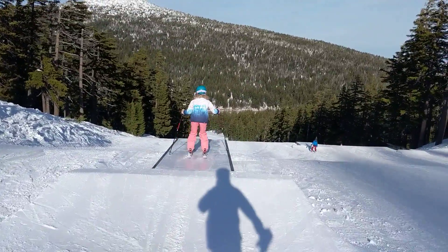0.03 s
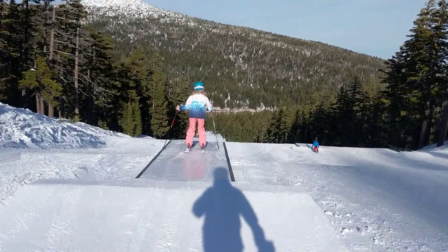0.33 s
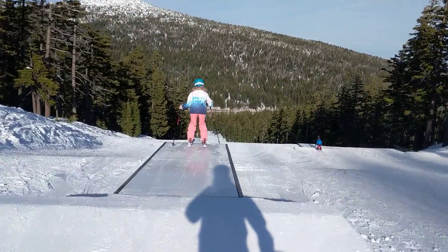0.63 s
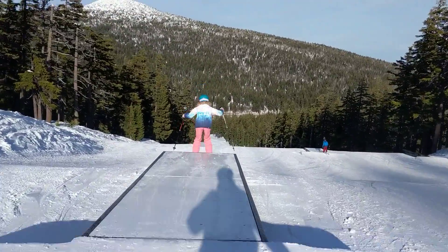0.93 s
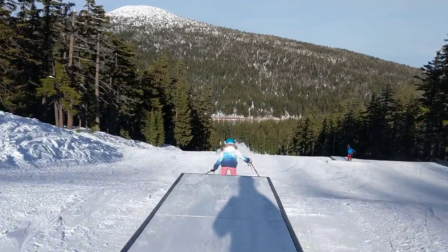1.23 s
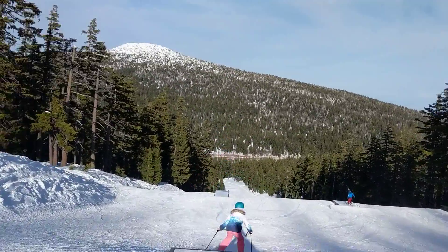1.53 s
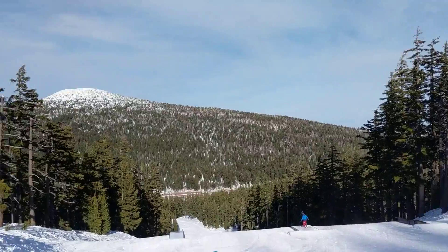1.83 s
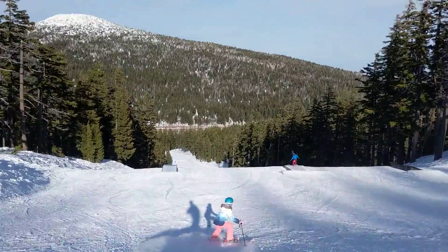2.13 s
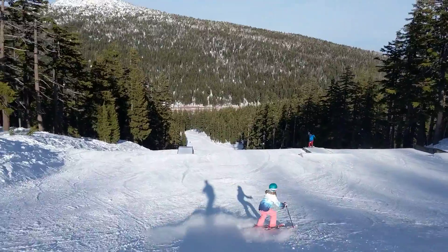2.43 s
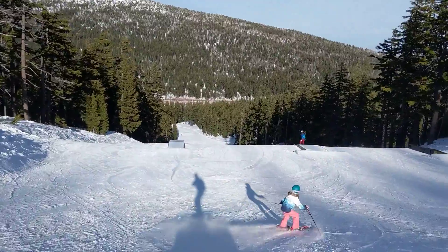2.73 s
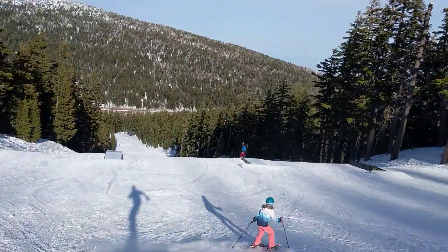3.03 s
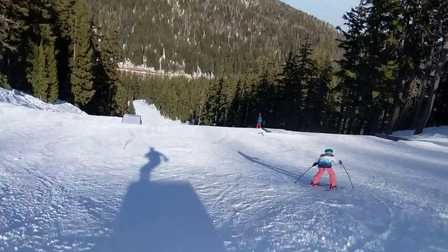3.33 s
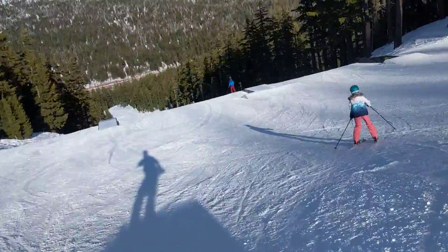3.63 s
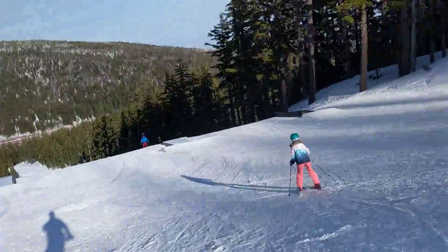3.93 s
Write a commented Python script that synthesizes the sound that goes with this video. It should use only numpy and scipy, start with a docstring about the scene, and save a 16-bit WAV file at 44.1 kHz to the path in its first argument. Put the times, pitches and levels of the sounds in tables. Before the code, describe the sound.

Skis clack onto a plastic box in a snow park, rub along it and slap down on packed snow. Their edges scrape through a braking turn and thud over bumps, while wind rumbles on the skier's own microphone.

```python
"""In a snow park, skis clack onto a plastic box, rub along it and slap down on packed snow.
Their edges scrape the crust in a braking turn, thud over hard bumps and skip through a last turn.
Rubbing makes the skis drone and ring, and jolts set them flapping.
Wind and ski vibration rumble in the skier's own mono camera."""
import sys
import numpy as np
from scipy import signal
from scipy.fft import rfft, irfft, next_fast_len
from scipy.io import wavfile
from scipy.ndimage import uniform_filter1d, map_coordinates

SR = 44100
rng = np.random.default_rng(int(sys.argv[2]) if len(sys.argv) > 2 else 0)


def materialize(psi):
    """Save the field psi as 16-bit PCM at rate SR to the path in sys.argv[1].

    A 1-D psi becomes a single channel; in a 2-D psi each row is a channel.
    """
    bounded = np.clip(np.atleast_2d(psi).T, -1, 1)
    quanta = np.round(bounded * 32767).astype(np.int16)
    wavfile.write(sys.argv[1], SR, quanta)


N = 4 * SR


def amp(db):
    """Turn decibels into a gain to multiply by."""
    return 10 ** (np.asarray(db) / 20)


def unit(x):
    """Scale a sound to an average power of 1."""
    return x / np.sqrt(np.mean(x ** 2) + 1e-20)


def level(rows):
    """A gain for each sample from (time [s], level [dB]) rows, fading fast outside them."""
    times, db = np.transpose(rows)
    t = np.arange(N) / SR
    outside_s = np.maximum(times[0] - t, 0) + np.maximum(t - times[-1], 0)
    return amp(np.interp(t, times, db) - 490 * outside_s)


def wobble(per_s):
    """A smooth curve through per_s random values a second."""
    values = rng.standard_normal(int(N * per_s / SR) + 4)
    return map_coordinates(values, [np.arange(N) * per_s / SR])


def coloured(x, colour):
    """Shape a sound's bass and treble with (frequency [Hz], level [dB]) rows."""
    size = 2 * next_fast_len(len(x))
    hz, db = np.transpose(colour)
    gain = amp(np.interp(np.log(np.fft.rfftfreq(size, 1 / SR) + 1), np.log(hz + 1), db))
    cepstrum = irfft(np.log(np.maximum(gain, 1e-6)))
    cepstrum[1:size // 2] *= 2  # fold it so the filter rings after a hit, never before
    cepstrum[size // 2 + 1:] = 0
    return irfft(rfft(x, size) * np.exp(rfft(cepstrum)))[:len(x)]


def resonate(x, hz, width_hz):
    """Keep the sound near one pitch: a narrow filter, then one twice as wide."""
    for width in (width_hz, 2 * width_hz):
        x = signal.lfilter(*signal.iirpeak(hz, hz / width, SR), x)
    return x


def rush(patchy_db):
    """Hiss with louder and softer patches scattered over time and pitch."""
    spectrum = signal.stft(rng.standard_normal(N), nperseg=512)[2]
    patches = uniform_filter1d(rng.standard_normal(spectrum.shape), size=7, axis=0)
    patches = unit(uniform_filter1d(patches, size=8, axis=1))
    return unit(signal.istft(spectrum * amp(patchy_db * patches), nperseg=512)[1][:N])


def grains(per_s, spread_db):
    """Tiny snaps of uneven size at random moments."""
    snaps = (rng.random(N) < per_s / SR) * rng.choice([-1, 1], N)
    sizes = amp(spread_db * np.minimum(rng.exponential(size=N), 4))
    return unit(snaps * sizes)


def blow(colour, crunch_db, crunch_t60, tail_db, tail_t60, treble_db=0):
    """One hit: a sharp push, a short crunch and a faint tail. A t60 is the seconds to fade by 60 dB."""
    t = np.arange(SR // 5) / SR
    fade = amp(crunch_db - 60 * t / crunch_t60) + amp(tail_db - 60 * t / tail_t60)
    hit = coloured(rng.standard_normal(len(t)) * fade, [(150, -5), (1500, 1.5)])
    hit[0] += 1  # the push
    hit = coloured(hit, colour)
    # make this hit brighter or duller by its own treble setting
    return coloured(hit / np.linalg.norm(hit), [(510, 0), (2500, treble_db)])


def add(track, start_s, x):
    """Mix a short sound into the track."""
    i = max(round(start_s * SR), 0)
    track[i:i + len(x)] += x[:max(N - i, 0)]


def rumble():
    """Wind and shaking make a low rumble at the microphone."""
    # strength of the rumble (time [s], level [dB])
    loudness = [(0, -56), (.09, -48), (.13, -44), (.21, -32), (.27, -44), (.4, -41), (.46, -48),
                (.8, -46.5), (1.05, -40.5), (1.22, -46.5), (1.35, -43), (1.6, -43), (1.88, -46.5),
                (2.05, -47), (2.14, -32.5), (2.3, -43.5), (2.42, -36.5), (2.6, -34.5), (2.72, -39.5),
                (2.82, -36), (2.9, -44), (3.02, -37.5), (3.28, -42.5), (3.36, -33.5), (3.45, -42),
                (3.53, -35), (3.65, -33), (3.8, -43), (3.94, -44), (4, -38)]
    # its deep tone (frequency [Hz], level [dB])
    colour = [(20, -41), (35, -20.5), (52, 2.5), (66, -3), (100, -6), (170, -10), (260, -20.5),
              (450, -38.5), (1500, -68.5)]
    noise = unit(coloured(rng.standard_normal(N), colour))
    swell = np.sqrt(np.abs(uniform_filter1d(noise ** 2, size=1800)) + 0.022)
    return level(loudness) * unit(noise / swell)  # dividing evens out chance swells


def flexing(rise_s=0.0028, t60=0.13):
    """A jolt sets the skis flapping for a few slow swings."""
    # jolts that bend the skis (time [s], level [dB], frequency [Hz])
    jolts = [(0.189, -27, 99), (1.333, -29.5, 71), (1.909, -33.5, 74), (1.954, -32, 72), (2.134, -23, 65),
             (2.209, -23, 62), (2.31, -26, 59), (2.427, -25, 54.6), (2.464, -20, 66), (2.814, -27, 67.4),
             (3.547, -26, 78)]
    out, t = np.zeros(N), np.arange(SR // 3) / SR
    shape = (1 - np.exp(-t / rise_s)) ** 2 * amp(-60 * t / t60)
    for start, db, hz in jolts:
        add(out, start, -amp(db) * shape / shape.max() * np.sin(2 * np.pi * hz * t))
    return out


def snow_hiss():
    """Snow hisses under the running skis."""
    # strength of the hiss (time [s], level [dB])
    loudness = [(0, -54), (.3, -52.5), (.8, -50.5), (1.3, -51.5), (1.55, -50.5), (1.8, -52), (1.9, -56),
                (2.04, -55.5), (2.2, -58), (3.3, -52), (3.57, -53), (3.72, -49.5), (3.8, -54), (4, -40)]
    # tone of the snow (frequency [Hz], level [dB])
    colour = [(100, 6.5), (700, 1.5), (1500, 3.5), (3000, 0.5), (5000, 0.5), (7000, 0), (8400, 6.5),
              (9400, -5.5), (11000, -15.5), (15500, -26)]
    snow = rush(patchy_db=3) + amp(-7.5) * grains(per_s=250, spread_db=-0.5)
    return unit(coloured(snow, colour)) * level(loudness) * amp(0.64 * wobble(25.26))


def box_slide():
    """The skis rub along the plastic box, which sings faintly under them."""
    # strength of the rubbing (time [s], level [dB])
    loudness = [(0, -64), (.27, -52.5), (.45, -48.5), (.9, -48), (1.1, -50), (1.2, -56.5), (1.27, -46),
                (1.34, -58.5), (1.55, -76), (1.8, -64), (2, -55.5)]
    # tone of skis on plastic (frequency [Hz], level [dB])
    colour = [(80, -9), (300, 6), (800, 4), (1200, 0), (1800, -0.5), (2500, -0.5), (3200, -4), (4500, -7),
              (8000, -11.5), (11000, -34)]
    rub = unit(coloured(rush(patchy_db=2) + amp(-6) * grains(per_s=600, spread_db=5), colour))
    ring = unit(resonate(rush(patchy_db=2), hz=2830, width_hz=140))
    return (rub + amp(-12) * ring) * level(loudness) * amp(wobble(35.35))


def ski_drone():
    """The skis give a lumpy drone as they run under the skier's weight."""
    # strength of the drone (time [s], level [dB])
    loudness = [(0, -48), (.09, -45), (.14, -39), (.28, -53.5), (.44, -44.5), (.7, -49.5), (.82, -44),
                (.9, -43), (1.04, -52.5), (1.14, -49), (1.27, -45.5), (1.39, -46.5), (1.55, -40.5),
                (1.7, -48), (1.82, -52.5), (1.96, -52.5), (2.04, -55), (2.075, -33.5), (2.15, -44),
                (2.19, -49), (3.2, -46.5), (3.3, -49), (3.45, -50.5), (3.58, -63), (3.63, -45), (3.72, -44),
                (3.79, -46.5), (4, -58)]
    # its hollow tone (frequency [Hz], level [dB])
    colour = [(40, -11.5), (130, -0.5), (280, 5), (430, -3.5), (600, -3.5), (880, -9.5), (1150, -20),
              (2000, -27.5), (5000, -47)]
    lumps = rush(patchy_db=1.5) + amp(-2.5) * grains(per_s=90, spread_db=4)
    return unit(coloured(lumps, colour)) * level(loudness) * amp(1.75 * wobble(29.36))


def ski_ring():
    """Rubbing keeps the skis ringing at their own pitch."""
    # strength of the ringing (time [s], level [dB])
    loudness = [(1.32, -68), (1.39, -46.5), (1.6, -58), (1.71, -49.5), (1.8, -71), (2.05, -66), (2.08, -56),
                (2.14, -44), (2.18, -51), (2.25, -51.5), (2.35, -57), (2.38, -47), (2.54, -43.5),
                (2.8, -41), (2.87, -40.5), (2.95, -41), (3.09, -39), (3.14, -55), (3.25, -59)]
    ring = resonate(rush(patchy_db=2.9), hz=857, width_hz=163)
    return unit(ring) * level(loudness) * amp(0.4 * wobble(40))


def scuffs():
    """Short rubs of the skis swell and fade, each around one pitch."""
    # brief rubs (middle time [s], length [s], level [dB], frequency [Hz], width [Hz])
    rubs = [(.083, .025, -51, 540, 450), (0.202, 0.021, -44, 1900, 2200), (.38, 0.016, -43, 1900, 2200),
            (0.435, 0.012, -43.5, 700, 900), (0.528, 0.033, -47.5, 1930, 1500),
            (1.144, 0.033, -53, 2830, 200), (1.264, 0.027, -50, 1900, 2000), (1.542, 0.018, -35, 640, 690),
            (2.075, 0.023, -40, 650, 600), (2.08, 0.022, -44, 2400, 2800), (2.124, 0.011, -31, 1900, 1290),
            (2.515, 0.0082, -39, 1490, 900), (2.691, 0.021, -39, 1500, 1400), (2.869, 0.014, -36, 593, 160),
            (3.25, 0.033, -44, 420, 200), (3.277, 0.019, -43.5, 590, 350), (3.385, 0.018, -42.5, 1145, 300),
            (3.611, 0.015, -31.5, 840, 500), (3.72, 0.027, -45, 470, 348)]
    # softening of their highest treble (frequency [Hz], level [dB])
    treble_cut = [(8000, 0), (11000, -18), (15000, -28)]
    out = np.zeros(N)
    t = np.arange(SR // 5) / SR - 0.1  # zero at the middle of a rub
    for middle, length, db, hz, width_hz in rubs:
        swell = np.exp(-2 * (t / length) ** 2)
        rub = resonate(rng.standard_normal(len(t)), hz, width_hz) * swell
        add(out, middle + t[0], amp(db) * rub * np.linalg.norm(swell) / np.linalg.norm(rub))
    return coloured(out, treble_cut)


def braking_turn():
    """The edges shave and break the snow crust: a bright, grainy spray over a dull scrape."""
    # how hard the edges press (time [s], level [dB])
    pressure = [(2.14, -45), (2.152, -47.5), (2.272, -40), (2.298, -49), (2.364, -46), (2.372, -38),
                (2.474, -37), (2.584, -44), (2.596, -38.5), (2.924, -35), (2.942, -34), (3.068, -35.5),
                (3.25, -46), (3.33, -73)]
    # tone of the spray (frequency [Hz], level [dB])
    spray_colour = [(710, -43), (1200, -3), (1520, -1), (2220, -4), (3090, -1), (3440, -2.5), (4320, -1),
                    (6780, -1.5), (8230, 3), (10700, -19.5), (15700, -32)]
    # tone of the scrape (frequency [Hz], level [dB])
    scrape_colour = [(60, 11), (200, 4), (600, 15), (1100, 1), (1400, -22), (4000, -57)]
    crust = rush(patchy_db=1.9) + amp(-9.5) * grains(per_s=900, spread_db=-1)
    spray = unit(coloured(crust, spray_colour)) * amp(0.9 * wobble(55))
    scrape = unit(coloured(rush(patchy_db=-3.5), scrape_colour))
    return level(pressure) * (amp(0.13) * spray + amp(-18.5) * scrape)


def last_turn(skips_per_s=170):
    """The edges skip unevenly over ribbed snow."""
    # how hard the edges press (time [s], level [dB])
    pressure = [(3.76, -47), (3.86, -43.5), (3.88, -36.5), (3.93, -34.5), (3.955, -27.5), (4, -27)]
    # low tone of the skipping edges (frequency [Hz], level [dB])
    colour = [(71, -36), (120, -35), (235, -5.5), (294, -2.5), (425, -9), (554, -14), (639, -22),
              (783, -10), (922, -19), (1670, -20), (3470, -30), (8180, -39), (15700, -62)]
    skip_count = np.floor(np.cumsum(skips_per_s * np.exp(0.28 * wobble(120))) / SR)
    skips = unit(np.diff(skip_count, prepend=0) * amp(2.7 * wobble(150)))
    return level(pressure) * unit(coloured(rush(patchy_db=1.5) + amp(-7) * skips, colour))


def clacks(tick_s=0.002, rebound_s=0.0014):
    """Each ski tip ticks, hits and bounces on the box, which rings briefly."""
    # ski tips meeting the box (time [s], relative level [dB])
    tips = [(0.1569, -9), (0.1801, -10)]
    # bright tone of a clack (frequency [Hz], level [dB])
    colour = [(100, -19), (700, -17), (1500, -7), (2500, -5), (2950, 1), (3400, -3), (4400, 5), (6600, 6),
              (8000, -5), (9500, -17), (15000, -46)]
    # the box's own notes (frequency [Hz], relative level [dB], time to fade by 60 dB [s])
    box_notes = [(887, -23, 0.073), (1545, -21, 0.027), (2930, -26.5, 0.065)]
    out, t = np.zeros(N), np.arange(SR // 5) / SR
    for start, db in tips:
        for delay, contact_db in [(-tick_s, -4), (0, 10), (rebound_s, 10)]:
            hit = blow(colour, crunch_db=-20.5, crunch_t60=0.01, tail_db=-41, tail_t60=0.035)
            add(out, start + delay, amp(db + contact_db) * hit)
        for hz, note_db, t60 in box_notes:
            add(out, start, amp(db + note_db - 60 * t / t60) * np.sin(2 * np.pi * hz * t))
    return out


def impacts():
    """The skis slap on hard snow or the box, thud over bumps and bang flat on a hard ridge."""
    # undersides slapping down (time [s], relative level [dB], treble [dB])
    slaps = [(0.1967, -28, 6), (1.53, -33, -2), (1.545, -24.5, -9), (1.549, -16.5, -8), (2.1102, -6, 5),
             (2.1121, -10, -12), (2.1162, -2, 0), (2.119, -5, -8), (2.1265, -15, -5), (2.139, -13.5, -10),
             (2.377, -19.5, -6.5), (2.514, -19.5, -2), (2.578, -26, 1), (2.796, -17.5, 3), (2.914, -23, 11),
             (2.988, -17.5, -1), (3.042, -21.5, 7), (3.087, -23, -11), (3.386, -34, 2)]
    # sharp tone of a slap (frequency [Hz], level [dB])
    slap_colour = [(60, -5), (300, -4.5), (450, -8), (640, 4.5), (780, 4.5), (1020, 6), (1300, -11.5),
                   (1780, -7.5), (2150, -15), (2700, -11), (4500, -23), (5700, -18.5), (8200, -21.5),
                   (10000, -36), (15000, -70)]
    # bumps under the skis (time [s], relative level [dB])
    thuds = [(0.129, -28), (.196, -34), (1.176, -39), (1.275, -34), (1.339, -29.5), (2.135, -20),
             (2.377, -20.5), (2.464, -24.5), (2.641, -22), (2.756, -26), (2.819, -32), (3.017, -19),
             (3.085, -22.5), (3.336, -36), (3.363, -30.5), (3.505, -25)]
    # dull tone of a thud (frequency [Hz], level [dB])
    thud_colour = [(30, -19), (70, 0), (200, 4), (330, -7.5), (550, -22), (1000, -36), (3000, -57)]
    # hits on the ridge (time [s], relative level [dB], treble [dB])
    bangs = [(3.6012, -14, -7), (3.604, -18.5, 10.5), (3.617, -22, -2), (3.625, -12.5, -2),
             (3.628, -11, 4.5), (3.634, -15.5, -12), (3.659, -22, 2), (3.665, -24, -22), (3.681, -26, -10),
             (3.706, -28, -7)]
    # heavy tone of a bang (frequency [Hz], level [dB])
    bang_colour = [(40, -20), (120, -3), (230, 6), (345, -1), (480, -4.5), (600, -17.5), (800, -12.5),
                   (1300, -29), (1700, -25.5), (2500, -42), (5000, -44), (8500, -46.5), (11000, -67)]
    out = np.zeros(N)
    for start, db, treble_db in slaps:
        slap = blow(slap_colour, crunch_db=-15.5, crunch_t60=0.018,
                    tail_db=-37, tail_t60=0.048, treble_db=treble_db)
        add(out, start, amp(db + 11.5) * slap)
    for start, db in thuds:
        thud = blow(thud_colour, crunch_db=-22, crunch_t60=0.029, tail_db=-30.5, tail_t60=0.1)
        add(out, start, amp(db + 21) * thud)
    for start, db, treble_db in bangs:
        bang = blow(bang_colour, crunch_db=-17, crunch_t60=0.019,
                    tail_db=-41, tail_t60=0.13, treble_db=treble_db)
        add(out, start, amp(db + 22) * bang)
    return out


def scene():
    """Everything reaches one microphone, so left and right are the same."""
    sliding = snow_hiss() + box_slide() + ski_drone()
    scraping = braking_turn() + ski_ring() + last_turn()
    mono = sliding + scraping + rumble() + flexing() + clacks() + impacts() + scuffs()
    return np.array([mono, mono])


def record(dry, bottom_hz=36, top_hz=15850):
    """The camera cuts the deepest bass and the highest treble."""
    bass_cut = signal.butter(4, bottom_hz, "high", fs=SR, output="sos")
    size = next_fast_len(N + SR // 2)
    spectrum = rfft(signal.sosfilt(bass_cut, dry), size)
    below_top = np.fft.rfftfreq(size, 1 / SR) < top_hz
    return irfft(spectrum * below_top, size)[:, :N]


dry = scene()
out = record(dry)
materialize(out)
```